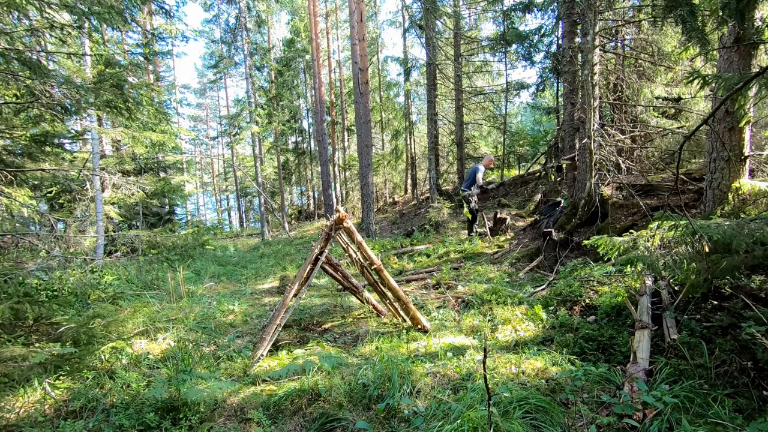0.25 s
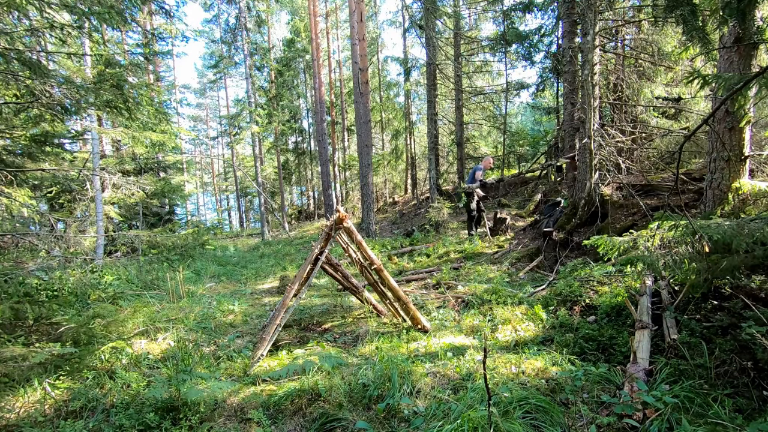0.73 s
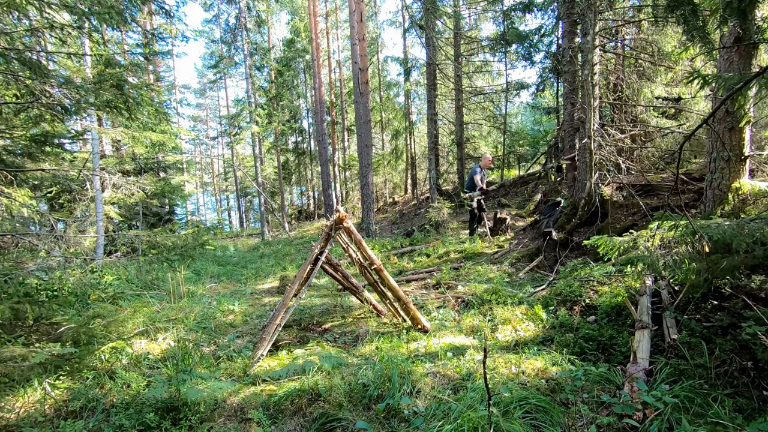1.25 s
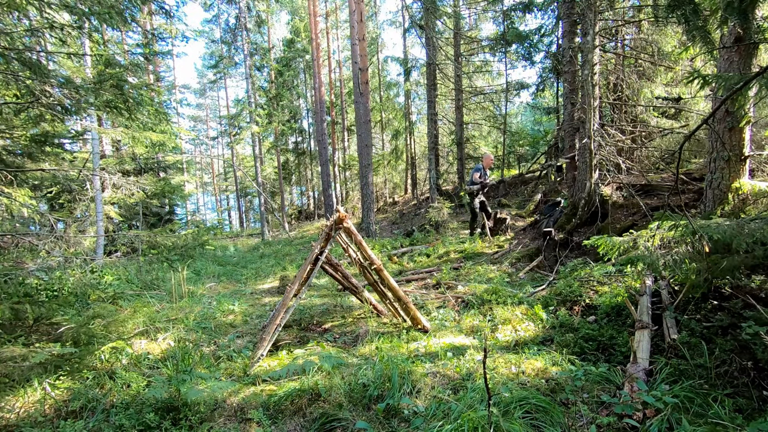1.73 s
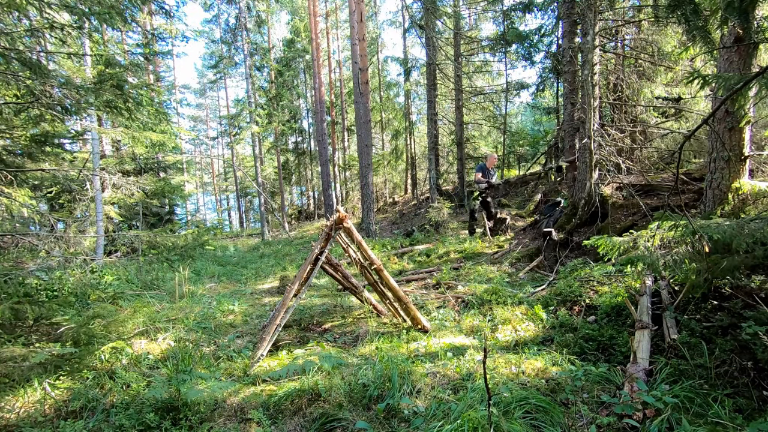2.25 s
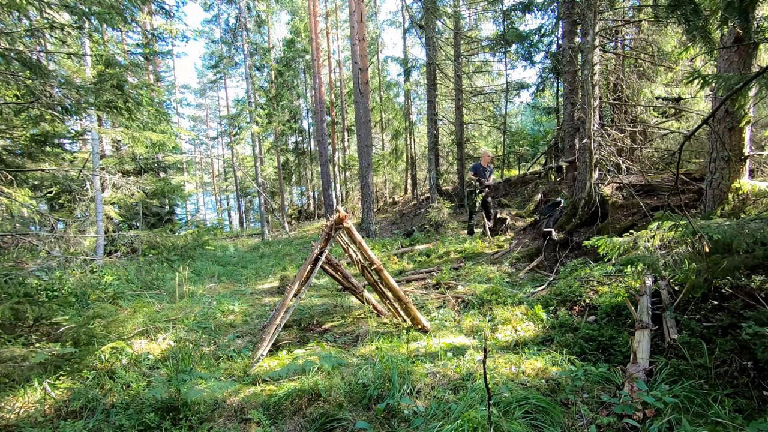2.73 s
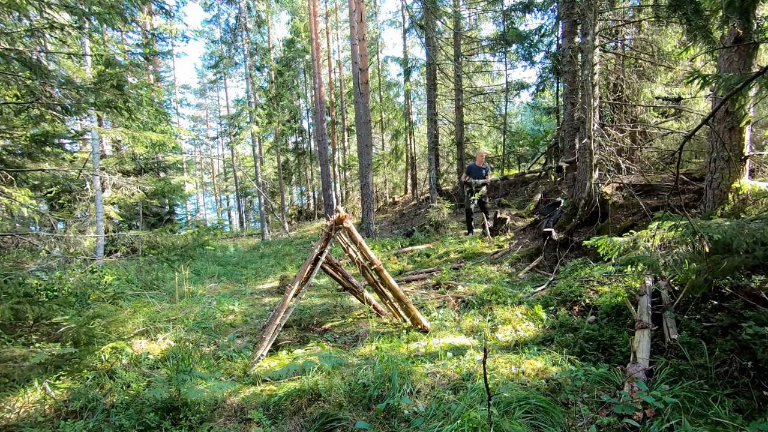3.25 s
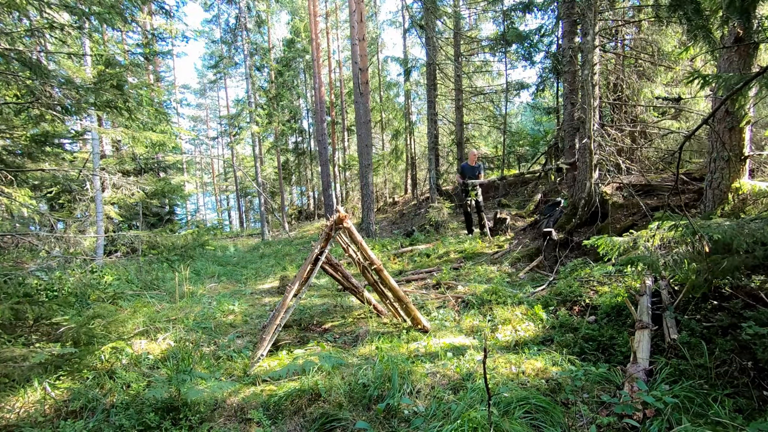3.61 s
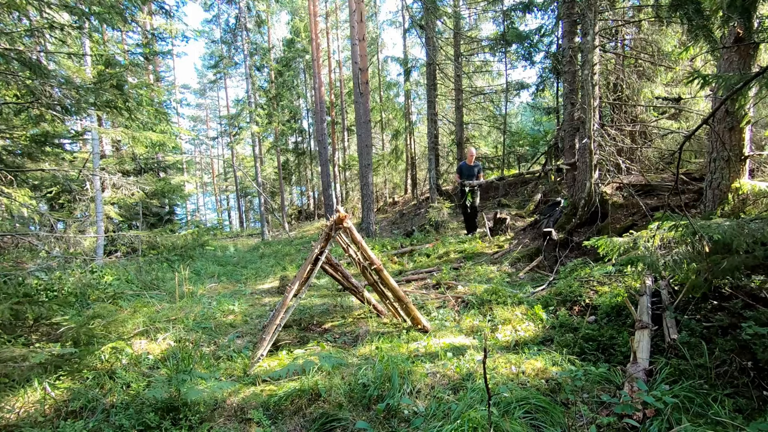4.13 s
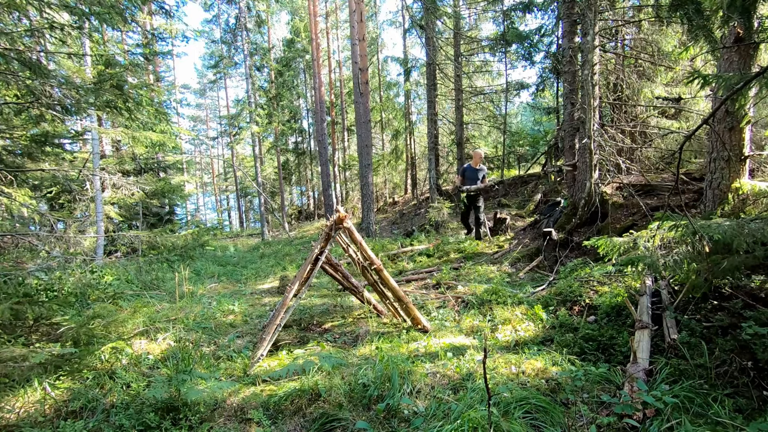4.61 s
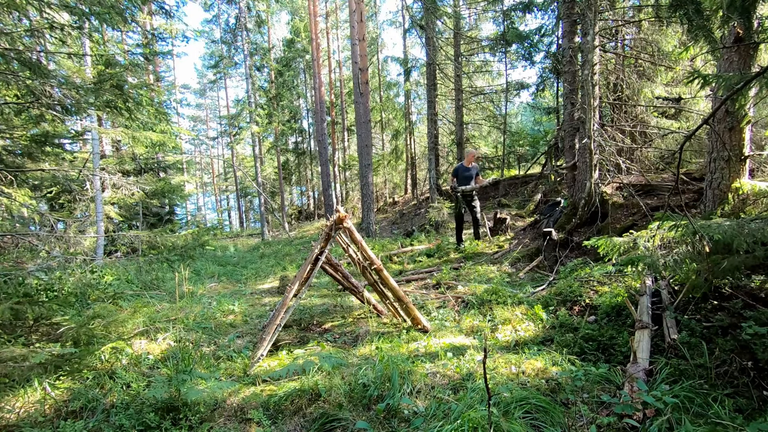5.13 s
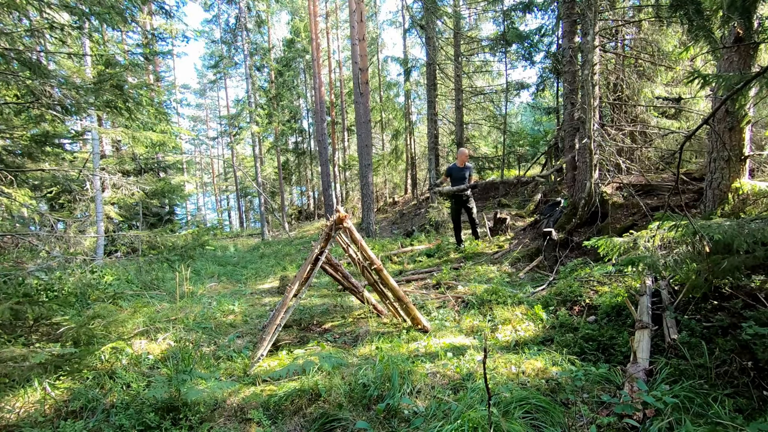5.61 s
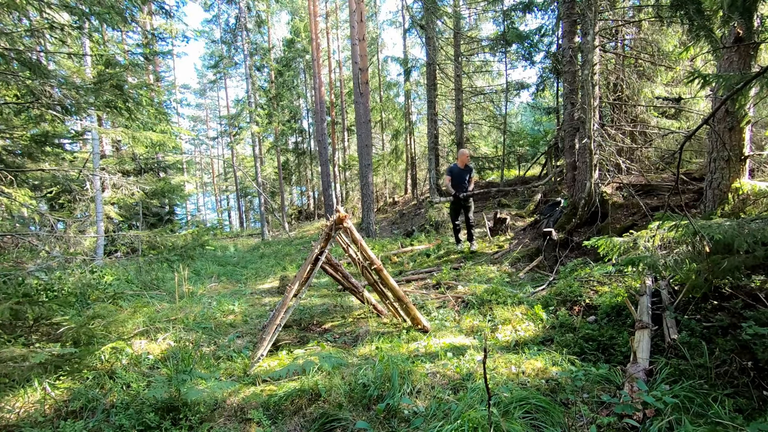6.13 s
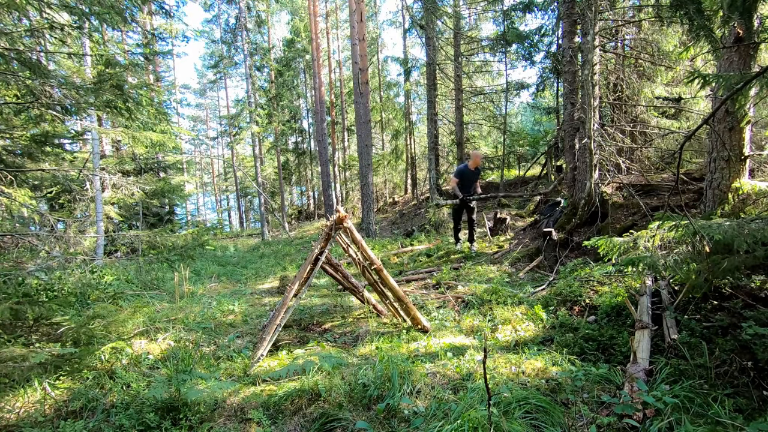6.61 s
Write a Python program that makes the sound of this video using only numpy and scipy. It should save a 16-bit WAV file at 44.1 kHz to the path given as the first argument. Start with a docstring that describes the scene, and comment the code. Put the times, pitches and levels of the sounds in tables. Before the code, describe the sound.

In a quiet spruce forest, dry branches crack sharply and echo off trunks while birds warble and call thinly, then sticks knock and twigs snap.

```python
"""A quiet spruce forest under a faint hush; someone breaks dead branches some way from a microphone pair.
First a bird warbles and whistles while sticks rustle; at 0.6 s a branch gives way, at 1.8 s a longer run.
Rising notes come before that run; knocks follow it, then falling notes, a last crack and thin high calls.
From 5.2 s sticks knock together, at 6.1 s the heaviest thud lands, and at 6.6 s twigs snap in a flurry.
Wood is torn, ringing noise, birds are gliding tones, and random trunk echoes scatter both."""
import sys
import numpy as np
from scipy import signal
from scipy.fft import rfft, irfft, next_fast_len
from scipy.io import wavfile

SR = 44100
rng = np.random.default_rng(int(sys.argv[2]) if len(sys.argv) > 2 else 0)


def persist_wave(psi):
    """Save psi, clipped to +-1, as 16-bit WAV."""
    counts = np.round(np.clip(psi, -1, 1) * 32767).astype(np.int16)
    wavfile.write(sys.argv[1], SR, np.atleast_2d(counts).T)


N = 302349


def gain_of(db):
    """Decibels to amplitude."""
    return 10 ** (np.asarray(db) / 20)


def evened(x):
    """Scales to rms 1."""
    return x / np.sqrt(np.mean(x ** 2) + 1e-30)


def read(points, hz):
    """Reads a curve of (f, value) points on a log-frequency axis."""
    f, value = np.transpose(points)
    return np.interp(np.log(hz + 1), np.log(f + 1), value)


def lift(hz, centre, width, db):
    """A resonance as a hump in dB."""
    return db / (1 + (2 * (hz - centre) / width) ** 2)


def add(mix, s, sound):
    """Adds a sound into a mix at a time in seconds."""
    part = mix[..., max(round(s * SR), 0):][..., :sound.shape[-1]]
    part += sound[..., :part.shape[-1]]


def wander(rate, count):
    """Random values at this rate per second, joined by straight lines."""
    knots = np.arange(count) * rate / SR
    return np.interp(knots, np.arange(8192), rng.standard_normal(8192))


def causal(gain):
    """Minimum-phase response with this gain: sharp front, ringing after."""
    log_gain = np.log(np.maximum(gain / gain.max(), 1e-5))
    circle = np.concatenate([log_gain, log_gain[-2:0:-1]])
    phase = -signal.hilbert(circle).imag[:len(gain)]
    return gain * np.exp(1j * phase)


def sides(db):
    """Left and right gains for a left-over-right level difference, at constant power."""
    pair = gain_of(np.array([db, -db]).reshape(2, -1) / 2)
    return pair / np.sqrt(np.mean(pair ** 2, 0))


def ports(hz, tilt):
    """Phase and level that the housing gives to each microphone; tilt scales the level difference."""
    # lead of the left microphone: f/Hz, phase/rad
    left_lead = [(50, 1), (450, -0.7), (1100, 1.12), (2200, 0.47), (4200, 0.37), (5200, 1.7), (6500, -0.34),
                 (8300, -2.5), (10000, -2), (11000, -2.5), (16000, -1.5)]
    # left over right before the tilt factor: f/Hz, level/dB
    left_excess = [(100, -3), (450, -6), (1000, -21), (2300, -10.5), (4500, -1.5), (5500, 1), (7900, 8.5),
                   (9200, -3), (10100, 14), (12000, -1)]
    half_turn = .5j * np.array([[1], [-1]]) * read(left_lead, hz)
    return sides(tilt * read(left_excess, hz)) * np.exp(half_turn)


def diffuse(pair, colour, tilt):
    """Colours two unrelated signals and makes them partly alike, as sound from many sides."""
    # likeness of the two microphones for diffuse sound: f/Hz, correlation
    pair_likeness = [(50, 0.35), (300, 0.47), (800, 0.36), (2000, 0.59), (3900, 0.83), (5000, 0.34),
                     (10000, 0.46), (14000, .15)]
    size = next_fast_len(pair.shape[1] + 2048)
    hz = np.fft.rfftfreq(size, 1 / SR)
    a, b = rfft(pair, size)
    same = np.clip(read(pair_likeness, hz), 0, 1)
    alike = np.array([a, same * a + np.sqrt(1 - same ** 2) * b])
    heard = alike * ports(hz, tilt) * gain_of(read(colour, hz))
    return irfft(heard, size)[:, :pair.shape[1]]


def hush():
    """Faint steady air in the treetops: coloured noise from all sides."""
    # air in the trees: f/Hz, level per Hz/dB before the sound is evened
    air_colour = [(12, -42), (20, -4), (86, -23.5), (168, -3), (310, -5.5), (422, -3), (738, 0.5),
                  (1660, -3), (1810, -4.5), (2910, -4.5), (4940, -14.5), (7310, -12.5), (8410, -17.5),
                  (9400, -24), (16000, -49)]
    level_db = -59.5
    return gain_of(level_db) * evened(diffuse(rng.standard_normal((2, N)), air_colour, tilt=0.17))


def forest(x, near_db, near_t60, deep_db, trunk_db=5.5, stand_s=0.049, stand_width_s=0.012, stand_db=-0.5):
    """Near trunks scatter a quick, grainy tail shaped by a dense stand; the deep forest adds a long one."""
    # scatter from the trunks: f/Hz, level/dB
    trunk_colour = [(100, 8), (400, -9), (800, 0), (1400, -3), (2500, 0), (4000, 0), (5300, 5.5),
                    (7500, -4), (10000, -2.5), (14000, 2)]
    # decay of the deep forest: f/Hz, time to fall 60 dB/s
    deep_t60 = [(150, 0.48), (1500, 1.07), (4000, 0.83), (8000, 0.86), (14000, 0.83)]
    t = np.arange(SR + SR // 2) / SR
    # near: about 5000 sparse reflections a second, of uneven size
    taps = rng.choice([-1, 1], (2, len(t))) * (rng.random((2, len(t))) < 5000 / SR)
    taps = taps * gain_of(trunk_db * np.minimum(rng.exponential(1, taps.shape), 4))
    near = taps * gain_of(-60 * t / near_t60) * (1 - np.exp(-t / 0.0017))
    near = near * gain_of(stand_db * np.exp(-((t - stand_s) / stand_width_s) ** 2))
    # deep: noise that decays at its own pace in each band
    hz, age, noise = signal.stft(rng.standard_normal(taps.shape), SR, nperseg=256)
    decay = gain_of(-60 * age / read(deep_t60, hz)[:, None])
    deep = signal.istft(noise * decay, SR, nperseg=256)[1][:, :len(t)]
    deep = deep * (1 - np.exp(-t / 0.033))
    tail = (gain_of(near_db) * evened(near) + gain_of(deep_db) * evened(deep)) / np.sqrt(len(t))
    return signal.fftconvolve(x[None], diffuse(tail, trunk_colour, tilt=0.074), axes=1)[:, :N]


def note(s, length, middle_hz, db, glide_hz, arch_hz, swing_hz, trill_hz, flick_hz, hidden, fade,
         waver_hz=35, flutter_db=1.5):
    """An arched glide whose trill swings or flicks up. Rows: heard directly, scattered by foliage."""
    u = np.linspace(-1, 1, int(length * SR))
    paths = np.sqrt(np.clip([[1 - hidden], [hidden]], 0, 1))  # hidden: share of the power
    turns = np.cumsum(trill_hz * (1 + 0.123 * wander(61.0, len(u)))) / SR
    flicks = (1 - abs(np.sin(np.pi * turns))) ** 1.5
    hz = middle_hz + glide_hz * u / 2 - arch_hz * u ** 2
    hz = hz + swing_hz * np.sin(2 * np.pi * turns) + flick_hz * flicks + waver_hz * wander(279, len(u))
    tone = np.sqrt(2) * np.sin(2 * np.pi * np.cumsum(hz) / SR)
    flutter = gain_of(db + flutter_db * wander(118, len(u)))
    return s, paths * flutter * tone * signal.windows.tukey(len(u), fade)


def birds():
    """Warbles, a whistle, rising and falling notes and thin calls from deep in the foliage: gliding tones."""
    # All start t/s, length/s, middle f/Hz, level/dB (before the trim of all birds in scene), then:
    # buzzy warbled notes: glide/Hz, arch/Hz, swing of the buzz/Hz
    warble_notes = [(0.038, 0.054, 4750, -58, 550, 80, 480), (0.142, 0.044, 4430, -63, 900, 300, 850),
                    (0.22, 0.04, 4170, -61, 890, 550, 520), (0.298, 0.048, 4020, -62, 350, 500, 260),
                    (0.412, 0.076, 4570, -62, 350, 1310, 260)]
    # a plain whistle: no more columns
    whistle_notes = [(0.378, 0.057, 6850, -68)]
    # rising notes: no more columns
    rising_notes = [(1.544, 0.021, 5560, -69.5), (1.666, 0.028, 5450, -68)]
    # falling notes: glide/Hz, arch/Hz
    falling_notes = [(2.971, 0.025, 6600, -59.5, -1500, 250), (3.145, 0.057, 6020, -62, -1450, 128),
                     (3.253, .067, 5770, -61, -1300, 3), (3.385, 0.075, 5320, -64.5, -1150, 0)]
    # thin scalloped calls: no more columns; f/Hz is the base below the flicks
    thin_notes = [(3.405, 0.07, 7900, -64.5), (3.572, 0.073, 7780, -64.5), (3.722, 0.085, 7870, -63.5),
                  (3.863, 0.14, 7690, -58), (4.075, 0.2, 7610, -56.5), (4.283, 0.17, 7480, -56),
                  (4.513, 0.17, 7450, -59)]
    notes = [note(*row, trill_hz=496, flick_hz=0, hidden=0.22, fade=.35, waver_hz=100)
             for row in warble_notes]
    notes += [note(*row, glide_hz=-32, arch_hz=-70, swing_hz=15, trill_hz=60, flick_hz=0, hidden=0.29, fade=.3)
              for row in whistle_notes]
    notes += [note(*row, glide_hz=950, arch_hz=80, swing_hz=20, trill_hz=150, flick_hz=0, hidden=.13, fade=.5)
              for row in rising_notes]
    notes += [note(*row, swing_hz=45, trill_hz=149, flick_hz=0, hidden=0.2, fade=.3)
              for row in falling_notes]
    notes += [note(*row, glide_hz=20, arch_hz=20, swing_hz=0, trill_hz=33, flick_hz=780, hidden=0.86, fade=.5)
              for row in thin_notes]
    out = np.zeros((2, N))
    for s, sound in notes:
        add(out, s, sound)
    return out


def thuds(ground_hz=36, knock_db=-13):
    """The springy forest floor shakes the microphones for a few cycles, with a little low noise."""
    # thuds through the ground: t/s (each starts 15 ms earlier), level/dB, length/s before a stretch of 1.48
    ground_thuds = [(0.743, -65, 0.054), (1.843, -64, 0.054), (3.344, -77.5, 0.074), (3.46, -77, 0.055),
                    (4.07, -61, 0.077), (4.783, -61, 0.064), (4.98, -70, 0.055), (5.54, -71, 0.083),
                    (5.695, -73, 0.067), (6.09, -50, 0.072), (6.781, -63, 0.087)]
    out = np.zeros(N)
    low_pass = signal.butter(2, 95, fs=SR, output="sos")
    for s, db, length in ground_thuds:
        t = np.arange(0, length * 1.48, 1 / SR)
        sway = evened(np.sin(2 * np.pi * (ground_hz * rng.uniform(.9, 1.05) * t + rng.random())))
        knock = evened(signal.sosfilt(low_pass, rng.standard_normal(SR)[:len(t)]))
        swell = np.hanning(len(t)) ** 1.3
        add(out, s - .015, gain_of(db) * swell * (sway + gain_of(knock_db) * knock))
    return np.array([out, 0.57 * np.roll(out, 90)])  # weaker and 2 ms later on the right


def moves():
    """How hard the sticks scrape and the fine twigs crackle over time: the strongest swell wins."""
    # moves of hands and feet: peak t/s, rise/s, fall/s, scraping level/dB, crackle level/dB
    # (both levels before the trims in handling)
    hand_moves = [(0.02, .1, 0.13, -55.5, -81), (0.43, 0.19, 0.34, -56, -83),
                  (0.66, 0.077, 0.049, -44, -65.5), (0.742, 0.016, 0.061, -40.5, -62.5),
                  (1.0, 0.027, 0.056, -59, -74.5), (1.25, 0.19, 0.13, -61, -82.5),
                  (1.75, 0.17, 0.051, -56, -75), (2.2, 0.16, .2, -68, -79.5),
                  (2.53, 0.14, 0.35, -63.5, -80.5), (3.3, 0.33, 0.2, -54, -87),
                  (4.0, 0.078, 0.17, -58, -83), (4.66, 0.17, 0.72, -69, -74), (4.91, 0.088, 0.1, -51, -72),
                  (5.195, 0.035, 0.039, -47.5, -77.5), (5.31, 0.32, 0.52, -51, -77.5),
                  (5.6, 0.3, 0.26, -48, -72.5), (5.8, 0.14, 0.17, -55, -75), (6.15, 0.16, 0.12, -51, -76.5),
                  (6.32, 0.13, 0.089, -61, -74), (6.47, 0.16, 0.099, -50, -73),
                  (6.645, 0.056, 0.099, -53, -66.5)]
    t, scrape, fine = np.arange(N) / SR, np.zeros(N), np.zeros(N)
    for s, rise_s, fall_s, sticks_db, crackle_db in hand_moves:
        swell = np.exp(-((t - s) / np.where(t < s, rise_s, fall_s)) ** 2)
        scrape = np.maximum(scrape, gain_of(sticks_db) * swell)
        fine = np.maximum(fine, gain_of(crackle_db) * swell)
    return scrape, fine


def grains(colour, per_s, spread_db, clump_db):
    """Clumped tiny slips of very uneven size, rms 1."""
    size = gain_of(spread_db * np.minimum(rng.exponential(1, (2, N)), 4))
    clicks = size * rng.choice([-1, 1], (2, N)) * (rng.random((2, N)) < per_s / SR)
    return evened(diffuse(clicks * gain_of(clump_db * wander(70, N)), colour, tilt=0.26))


def handling(scrape, fine, scrape_db=-7.5, twigs_db=15.5):
    """With each move, sticks scrape over each other and their fine twigs crackle: swelling grains."""
    # colour of scraping sticks: f/Hz, level/dB
    scrape_colour = [(100, -26), (250, -13), (700, -4), (1400, -0.5), (2300, -3), (3600, -5), (4800, -19.5),
                     (9000, -27), (16000, -86)]
    # colour of fine twigs: f/Hz, level/dB
    crackle_colour = [(500, -12.5), (2000, -5.5), (3700, -5), (4900, -10.5), (7000, -4), (8300, -4.5),
                      (9200, -15), (10200, -14.5), (11700, -26.5), (14000, -30), (16000, -36)]
    slips = grains(scrape_colour, per_s=1400, spread_db=2.4, clump_db=2.5)
    crackle = grains(crackle_colour, per_s=2800, spread_db=2.5, clump_db=2.0)
    return gain_of(scrape_db) * scrape * slips + gain_of(twigs_db) * fine * crackle


def play(cracks, thrown_db):
    """Mixes cracks. Rows: left, right, and the sound thrown into the trees."""
    out = np.zeros((3, N))
    for pieces in cracks:
        for s, sound in pieces:
            add(out, s, sound)
    return out * gain_of([[0], [0], [thrown_db]])


def bending(hz):
    """Bending waves of low pitch travel slowly and arrive late, so each click drops into a knock."""
    lag_s, corner_hz = 0.001914, 773
    lag = lag_s / (1 + (hz / corner_hz) ** 2)
    return np.exp(-2j * np.pi * np.cumsum(lag) * hz[1])


def stick_ring(db, ring_hz, ring_s, rise_s=0.000604, pan_db=-5.0, detune=0.067, size=2048):
    """A bumped stick swells into its bending modes and dies. Rows: left, right, sound thrown all round."""
    # bending modes of a loose stick: multiple of its ring, level/dB, share of the ring time
    stick_modes = [(0.63, -8, 1.7), (0.84, -4, 0.7), (1, 2.5, 1.08), (1.26, -0.5, 0.6), (1.55, -8, 1)]
    t, hz = np.arange(size) / SR, np.fft.rfftfreq(size, 1 / SR)
    pitches = ring_hz * (1 + detune * rng.uniform(-0.76, 1, len(stick_modes)))
    ring = np.zeros(size)
    for pitch, (multiple, mode_db, lasts) in zip(pitches, stick_modes):
        wave = np.cos(2 * np.pi * pitch * multiple * (t - 2 * rise_s))
        ring += gain_of(mode_db) * np.exp(-t / (ring_s * lasts)) * wave
    ring *= (1 - np.exp(-t / rise_s)) ** 2
    ring = gain_of(db) * np.sqrt(SR * .004) * ring / np.linalg.norm(ring)  # the level is rms over 4 ms
    direct = irfft(rfft(ring) * bending(hz) * ports(hz, tilt=0)) * sides(pan_db)
    return np.array([*direct, ring])


def fracture(body_db, bass_db, snap_db, treble_db, fizz_db, ring_hz, low_hz, tear_s, rupture, pan_db,
             ring_cycles=9.6, ring_share=0.15, ring_db=7, ring_width=0.26, size=4096):
    """Fibres tear around one clean rupture and the stick rings. Rows: left, right, sound thrown all round."""
    # colour of breaking dry wood: f/Hz, level/dB
    wood_colour = [(30, -31), (110, -18), (200, -5), (350, -4), (700, -3), (1000, -3.5), (1400, 2.5),
                   (2000, 1.5), (2700, 0.5), (3800, -1), (4800, -19.5), (6500, -12), (8000, -7),
                   (10000, -21), (11500, -31.5), (14000, -40), (16000, -57)]
    # lasting modes of the long branch: f/Hz, width/Hz, lift/dB
    branch_modes = [(338, 26, 3), (393, 27, 5), (584, 37, 0.5), (750, 32, 4), (1021, 38, 10.5),
                    (1566, 41, 5.5), (1845, 50, 5.5), (2035, 24, 4), (2360, 22, 5), (2500, 22, 3),
                    (3420, 140, 3)]
    t, hz = np.arange(size) / SR, np.fft.rfftfreq(size, 1 / SR)
    tear, ring = rng.standard_normal((2, size))
    tearing = tear * np.exp(-t / max(tear_s, .0004)) * (1 - np.exp(-t / .0002))
    clean = rupture * signal.unit_impulse(size, 14)
    ringing = ring_share * signal.lfilter([.5, .5], [1], ring) * np.exp(-t * ring_hz / ring_cycles)
    force = rfft(clean + tearing + ringing)
    # the branch rings, and every new piece has its own uneven overtones
    modes_db = lift(hz, ring_hz, ring_width * ring_hz, ring_db)
    modes_db += sum(lift(hz, *mode) for mode in branch_modes)
    modes_db += sum(lift(hz, f, .05 * f, 6) for f in 900 * 9 ** rng.random(7))
    # a short piece has no deep notes
    wood_db = read(wood_colour, hz) - 10 * np.log10(1 + (low_hz / (hz + 1)) ** 6)
    # the brighter the crack, the more it bites near 5 kHz: 0.97 dB per dB of treble above -2
    wood_db = wood_db + lift(hz, 5075, 1230, 0.97 * max(treble_db + 2, 0))
    # the thinner the stick, the higher its body begins
    body_edge = 540 - 22 * min(bass_db, 0)
    below = [1 / (1 + (hz / edge) ** 12) for edge in (body_edge, 2200, 4700)]
    below.append(1 / (1 + (hz / 8900) ** 30))
    shapes = abs(np.diff([0 * hz, *below, 1 + 0 * hz], axis=0))
    bands = list(zip(shapes, (bass_db, 0, snap_db, treble_db, fizz_db)))

    def radiate(drive, colour):
        """Shares the energy between bass, body, snap, treble and fizz."""
        power = sum(band * gain_of(db) ** 2 / np.sum(band * abs(colour * drive) ** 2) for band, db in bands)
        return drive * causal(colour * np.sqrt(power))

    direct = irfft(radiate(force, gain_of(wood_db + modes_db)) * bending(hz) * ports(hz, tilt=0.45))
    direct *= np.sqrt(np.mean(direct ** 2) / np.mean(direct ** 2, 1, keepdims=True)) * sides(pan_db)
    # summed over all directions, the peaks and dips partly even out
    all_round = irfft(radiate(1, gain_of(wood_db + .25 * modes_db)))
    return gain_of(body_db) * np.sqrt(size * SR * .002) * np.roll([*direct, all_round], 16, axis=1)


def splintering(s, body_db, bass_db, snap_db, treble_db, ring_hz, low_hz, tear_s, fizz_db, splinter_db,
                rupture, splinter_s=.009, count=3):
    """One crack and the few small splinters after it, as (s, sound) pairs."""
    # dull wood is louder on the right, bright wood on the left
    pan_db = np.clip(-0.6 + 0.44 * treble_db, -2, 2)
    # the air takes most of the highest fizz
    colour = bass_db, snap_db, treble_db, fizz_db + 0.088 * treble_db
    crack = fracture(body_db, *colour, ring_hz, low_hz, tear_s, rupture, pan_db)
    pieces = [(s - .0003, crack)]
    for late, weak, pitch in rng.random((count, 3)):
        splinter_hz = ring_hz * 2 ** (pitch - .5)
        splinter = fracture(body_db + splinter_db - 8 * weak, *colour, splinter_hz, low_hz, tear_s,
                            rupture, pan_db)
        pieces.append((s + .002 - splinter_s * np.log(1 - .95 * late), splinter))
    return pieces


def jostle(scrape, level_db=-3.0, spread_db=11.0, low_hz=1150, high_hz=2600, ring_s=0.0052, count=420):
    """Scraping sticks catch and tap each other at random, as hard as they scrape at that moment."""
    taps = []
    for when, weak, pitch in rng.random((count, 3)):
        ring_hz = low_hz * (high_hz / low_hz) ** pitch
        tap = scrape[int(when * N)] * stick_ring(level_db - spread_db * weak, ring_hz, ring_s)
        taps.append([(when * N / SR, tap)])
    return play(taps, thrown_db=-6.0)


def knocks(contact_db=-10, bass_db=-8, treble_re_snap_db=-18, low_hz=250, contact_s=0.0016):
    """Sticks bump each other: a dull contact and the hollow ring of the wood."""
    # sticks knocking together: t/s, ring level/dB, contact snap level/dB, ring f/Hz, ring time/s
    stick_bumps = [(2.0939, -42, -51, 1640, 0.005), (2.1655, -45, -52, 1610, .003),
                   (2.5352, -56.5, -53, 1460, 0.0036), (3.006, -48.5, -71, 1550, .002),
                   (3.98, -45.5, -55, 1557, 0.0052), (5.1898, -51, -60, 1910, .003),
                   (5.2, -46, -62, 1680, .003), (5.207, -49, -66, 1180, 0.0023),
                   (5.4477, -41, -55, 1530, 0.0021), (5.455, -49, -49.5, 1500, .001),
                   (5.525, -44.5, -51, 1830, .002), (5.533, -43, -59, 2120, 0.0039),
                   (5.539, -46, -56, 1210, .004), (5.552, -45.5, -64, 2360, 0.006),
                   (5.5687, -40, -50, 1500, 0.0034), (5.603, -48.5, -52, 1580, 0.0054),
                   (5.6376, -42.5, -58, 1535, 0.0068), (5.647, -58, -59, 1620, .003),
                   (5.675, -48.5, -52, 1340, 0.0037), (5.685, -50, -59, 1560, .003),
                   (5.7025, -45, -59, 1420, 0.0068), (5.76, -44, -49, 1600, 0.001),
                   (5.7796, -38, -63, 1410, 0.0033), (5.787, -51, -67, 1210, 0.0029),
                   (5.854, -40.5, -66, 1380, 0.0034), (6.1935, -50, -68, 1480, 0.0067)]
    bumps = []
    for s, db, snap_db, ring_hz, ring_s in stick_bumps:
        snap_re_body_db = snap_db - db - contact_db
        contact = splintering(s, db + contact_db, bass_db, snap_re_body_db,
                              snap_re_body_db + treble_re_snap_db, ring_hz, low_hz, contact_s,
                              fizz_db=-18, splinter_db=-12, rupture=0)
        bumps.append(contact + [(s, stick_ring(db, ring_hz, ring_s))])
    return play(bumps, thrown_db=-3.5)


def twigs(bass_db=-22, snap_db=1, snap_per_treble=0.24, ring_hz=2000, low_hz=1100, tear_s=0.0022,
          ring_s=0.0024):
    """Thin twigs snap: little bass, more snap the brighter they are, and a short ring."""
    # thin twigs snapping: t/s, body level/dB, treble re body/dB, ring re body/dB
    thin_snaps = [(0.5954, -51.5, 4, -10), (0.6096, -50, 1, -13), (1.7532, -43.5, -3, -10),
                  (2.327, -60.5, 6.5, -10), (2.808, -58.5, 4.5, -6), (2.98, -69, 9, -14),
                  (3.3302, -63, 3, -12), (3.374, -62, 3, -10), (3.387, -67, -2, 2),
                  (4.074, -60.5, 4.5, -10), (4.2432, -56, 4, -6), (4.625, -69, 18.5, -2),
                  (4.889, -66.5, 12, -10), (5.602, -53, 5, -12), (5.771, -57.5, 10.5, -1),
                  (6.1248, -54.5, 4, -12), (6.149, -54, 3, 3), (6.2773, -60, 8, -10), (6.353, -63, 11, -10),
                  (6.592, -59, 0, -4), (6.5952, -52.5, 5, -7), (6.6054, -42.5, 0, -10),
                  (6.6138, -39.5, 7.5, -2), (6.631, -59, 8, -7), (6.671, -45.5, 4, 4), (6.676, -53, -3, 1),
                  (6.6887, -51, 1, 1), (6.695, -41.5, 1, -1), (6.7043, -48, 3, 0), (6.787, -62, 4, -10),
                  (6.7958, -45, 3.5, -20), (6.799, -52, 3, -3)]
    snaps = []
    for s, db, treble_db, ring_db in thin_snaps:
        snap = splintering(s, db, bass_db, snap_db + snap_per_treble * treble_db, treble_db, ring_hz, low_hz,
                           tear_s, fizz_db=-3.5, splinter_db=-9, rupture=0.9)
        snaps.append(snap + [(s, stick_ring(db + ring_db, ring_hz, ring_s, pan_db=-6.0))])
    return play(snaps, thrown_db=-6.5)


def branches():
    """Thick branches give way in runs of fractures, each throwing its own share into the trees."""
    # fractures of a thick branch: t/s, body level/dB, then re body bass/dB, snap/dB, treble/dB;
    # ring of the stick f/Hz, lowest note of the piece f/Hz, tearing time/s (0.4 ms at least),
    # share thrown into the trees/dB (before the common trim)
    branch_breaks = [(0.632, -34.5, -12, -0.5, -3, 1100, 380, 0.00044, -6),
                     (0.6414, -43.5, -15, 8, -8, 3000, 400, 0.0014, -14),
                     (0.6502, -48, -9, 6, -6, 3100, 400, 0.0004, -9),
                     (0.657, -52, -9, 1, 7, 3100, 400, 0.0004, -5),
                     (0.6623, -35.5, -10.5, -1, -6, 1250, 300, 0.0017, -5),
                     (0.6654, -39, -3, -11, -12, 800, 200, 0.00083, -5),
                     (0.7270, -41, -11, -2, 1, 1800, 400, 0.001, -4),
                     (0.7308, -43, -15, -2, -1, 2000, 400, 0.0007, -2),
                     (0.7372, -50, -6, 4, -2, 3100, 400, 0.0007, -7),
                     (0.7536, -31, -10.5, 4.5, -2, 3080, 300, 0.00073, -4),
                     (0.7604, -25, -9.5, -5, 0, 2930, 330, 0.0014, -5),
                     (0.7666, -29, -12.5, -0.5, -5, 1840, 330, 0.0035, -2),
                     (0.7693, -29, -10.5, -1, -12, 1480, 110, 0.003, -4),
                     (1.7612, -26.5, -9.5, -2.5, -7.5, 1250, 302, 0.0022, -0.5),
                     (1.7722, -38.5, -16, -1, -15, 2900, 400, 0.00041, -4),
                     (1.8, -38.5, -18, -5, -8, 1840, 400, 0.00078, 6),
                     (1.8099, -25.5, -6, -9, -4, 1280, 300, 0.0022, -5),
                     (1.8456, -33, -5, -0.5, 1.5, 2150, 330, 0.0003, 5),
                     (1.8537, -25, -5, -3.5, -10, 2170, 290, 0.0014, -1),
                     (1.865, -36, -17, 0, -20, 2400, 400, 0.00064, -6),
                     (1.8707, -20, -7, 2, -7.5, 1410, 131, 0.0011, -3.5),
                     (1.8781, -34, -2, -2, -12, 900, 50, 0.001, -2),
                     (1.8856, -34, -15, -3, 2.5, 3490, 300, 0.0015, 2),
                     (1.9073, -38, -24, -5, -12, 1700, 300, 0.001, -2),
                     (1.9128, -28, -12, -1, -6, 3340, 140, 0.00096, -3),
                     (1.925, -34, -12, -6, -2.5, 1800, 250, 0.0024, 4.5),
                     (1.9679, -30, -8, -3, -11, 2230, 252, 0.0016, -0.5),
                     (1.9742, -38, -4, -10, -11, 1200, 250, 0.00089, -8),
                     (2.0211, -42.5, -11, 5, 4, 2740, 350, 0.00092, -2),
                     (2.0520, -36, -10.5, -5, -15, 2780, 100, 0.0034, 0.5),
                     (2.1463, -46.5, -18, 2, -3.5, 1730, 300, 0.00049, -2),
                     (3.0266, -28.5, -14.5, -4, 3, 1480, 400, 0.00043, -1.8)]
    cracks = []
    for *row, share_db in branch_breaks:
        pieces = splintering(*row, fizz_db=-11, splinter_db=-22.0, rupture=3.07)
        cracks.append([(s, sound * gain_of([[0], [0], [share_db]])) for s, sound in pieces])
    return play(cracks, thrown_db=-0.5)


def scene(birds_db=-1.0):
    """Wood and birds with their echoes, over rustle, thuds and air."""
    scrape, fine = moves()
    t = np.arange(N) / SR
    wood = branches() + twigs() + knocks() + jostle(scrape)
    song, hidden_song = gain_of(birds_db) * birds()
    # the facing turns nine times a second, so fractures at different moments light up other trunks
    facing = np.sqrt(2 / 3) * np.cos(2 * np.pi * (9 * t + np.arange(3)[:, None] / 3))
    echoes = sum(forest(wood[2] * share, near_db=-1.5, near_t60=0.35, deep_db=-12.0) for share in facing)
    song_echo = forest(hidden_song, near_db=1., near_t60=.25, deep_db=-5.)
    return wood[:2] + echoes + song + song_echo + handling(scrape, fine) + thuds() + hush()


def record(dry):
    """The band limit of the microphone channel: a low-pass at 16.1 kHz."""
    low_pass = signal.firwin(255, 16100, window=("kaiser", 9), fs=SR)
    return signal.oaconvolve(dry, low_pass[None], "same")


dry = scene()
out = record(dry)
persist_wave(out)
```